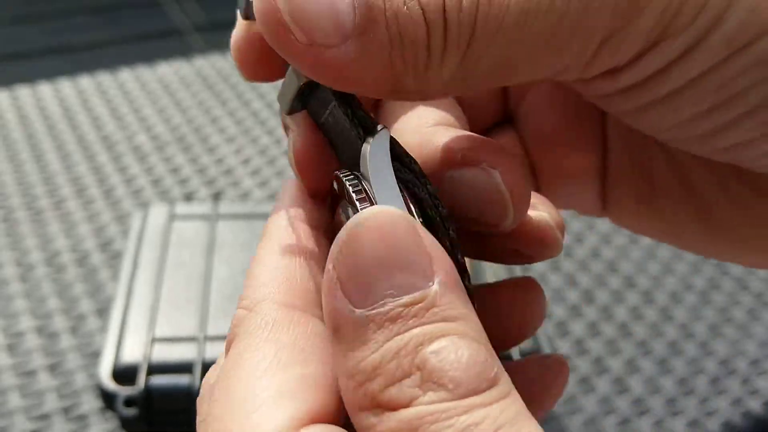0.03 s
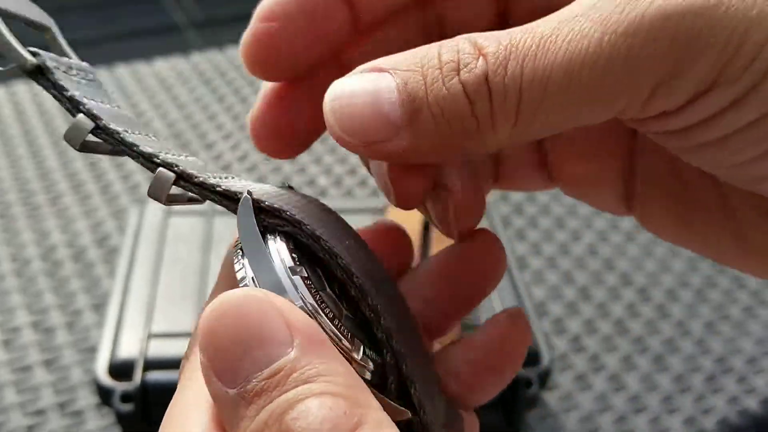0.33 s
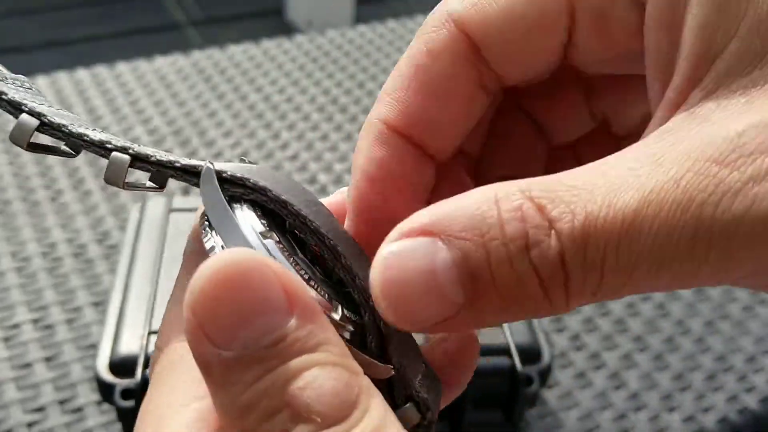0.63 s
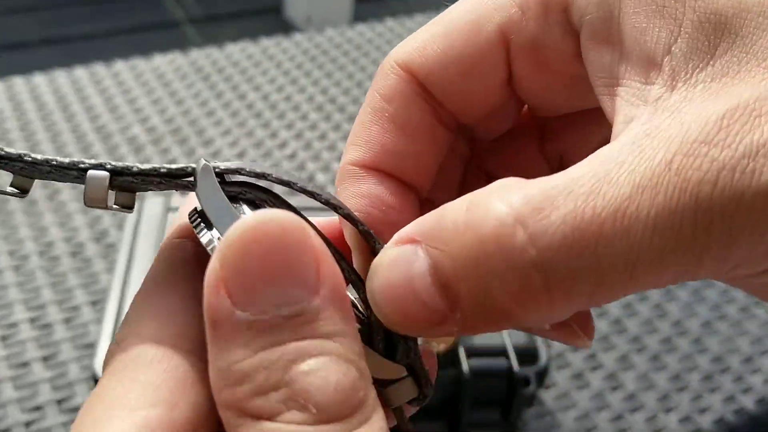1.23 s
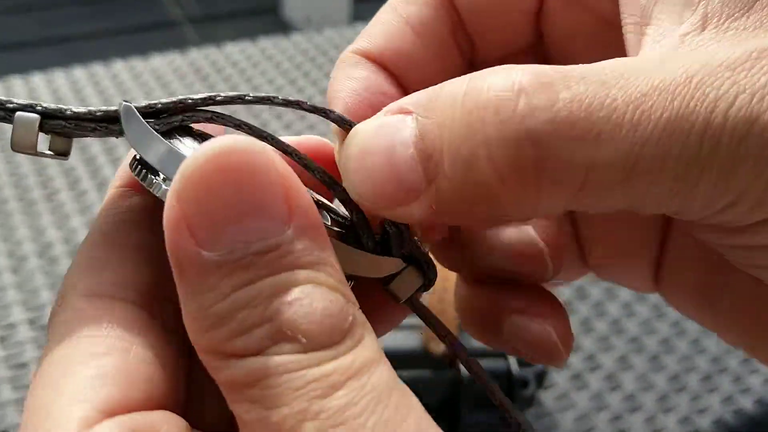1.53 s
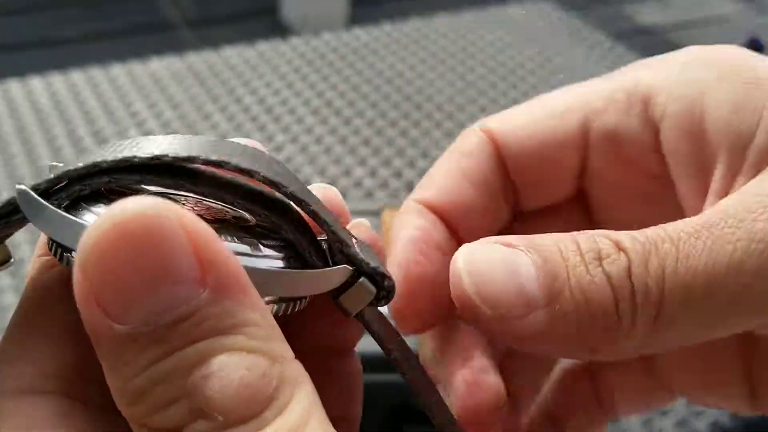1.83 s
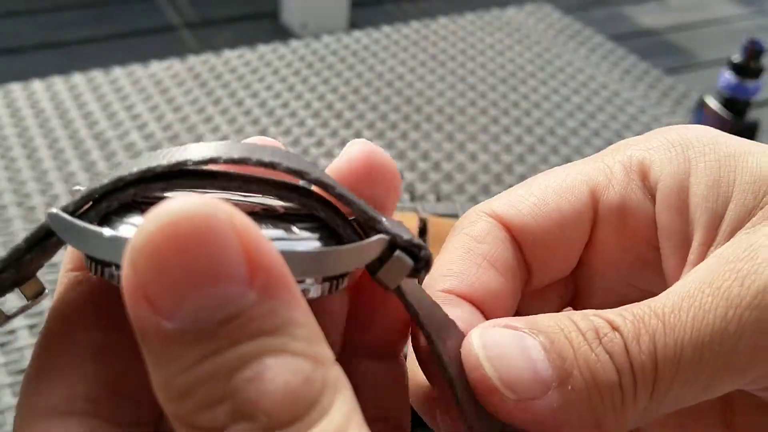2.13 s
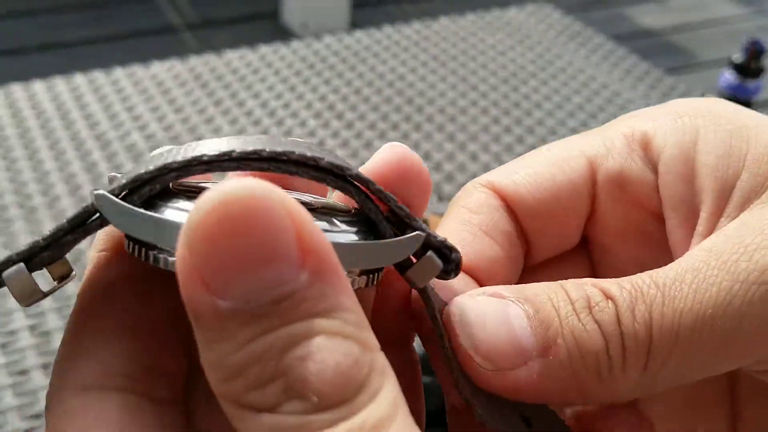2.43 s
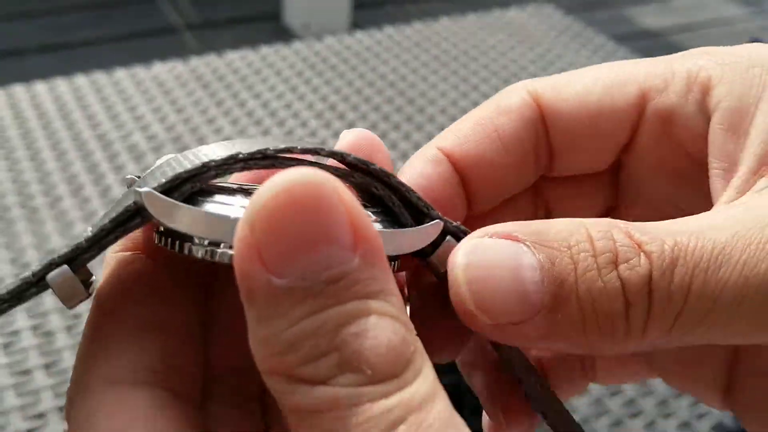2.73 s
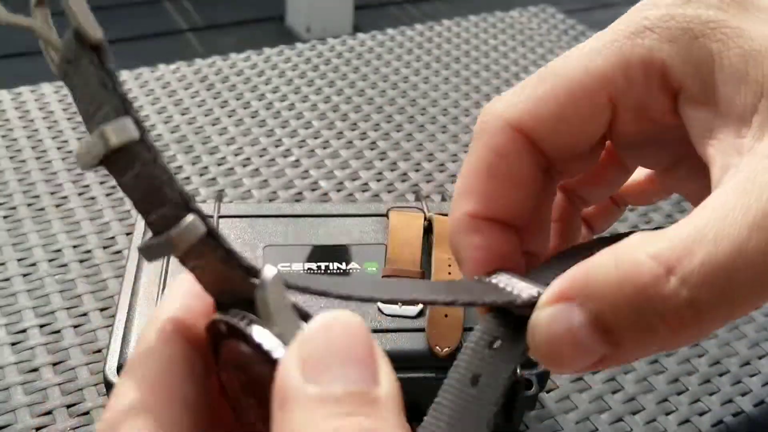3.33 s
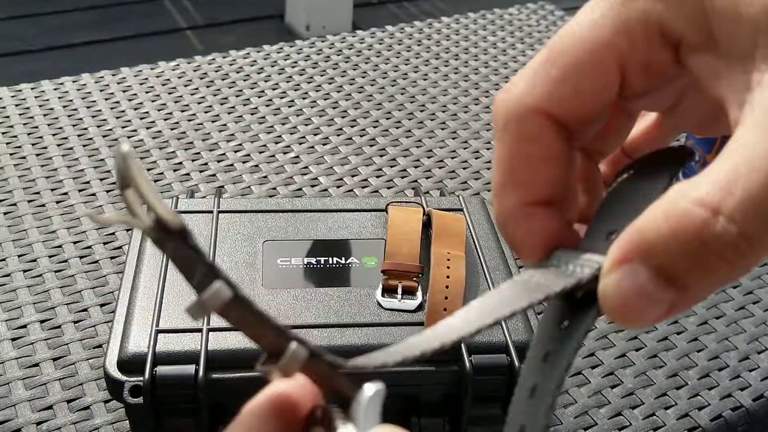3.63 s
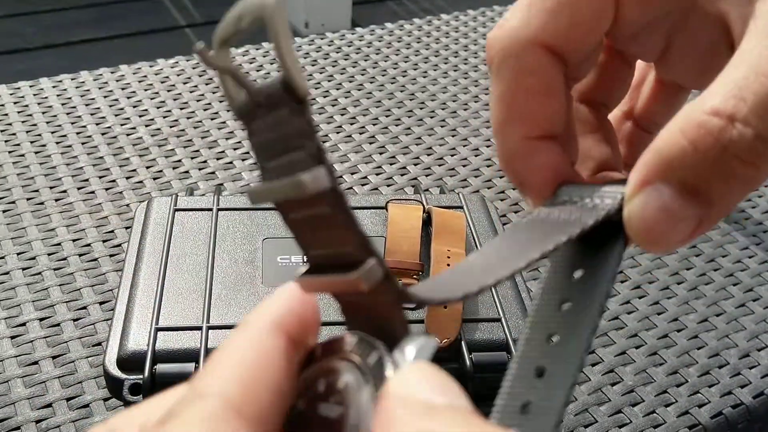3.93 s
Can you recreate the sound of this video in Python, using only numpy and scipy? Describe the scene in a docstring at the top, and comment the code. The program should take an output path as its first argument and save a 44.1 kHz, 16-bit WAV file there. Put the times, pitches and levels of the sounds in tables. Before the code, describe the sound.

A woven watch strap rustles and scrapes through a steel watch, with one sharp click.

```python
"""A woven strap is worked loose and drawn through the bars of a steel watch, close to the microphone.
Throughout: fan-like hum, low rumble, a soft distant wash with faint tones, hiss.
From 0.1 s fingers brush the weave and the fittings tick. At 1.19 s steel snaps on steel, once.
From 3.1 s the long pull swishes, rasps, then breaks into stick-slip jerks and snags as it tightens."""
import sys
import numpy as np
from scipy import signal
from scipy.io import wavfile
from scipy.ndimage import map_coordinates

SR = 44100
rng = np.random.default_rng(int(sys.argv[2]) if len(sys.argv) > 2 else 0)


def generate_wav(sig):
    """Save sig (samples, or channels by samples) to the path in sys.argv[1] as 16-bit PCM at SR."""
    pcm = np.round(np.clip(np.atleast_2d(sig).T, -1, 1) * 32767).astype(np.int16)
    wavfile.write(sys.argv[1], SR, pcm)


N = 176400
T = np.arange(N) / SR

# Table levels are relative. Colours are spectral densities.
# low rumble; deepest rumble, growing with the pull: (time [s], level [dB])
RUMBLE_LEVEL = [(0.0, -45.5), (0.14, -54), (0.17, -43.5), (0.36, -46.5), (0.66, -40.5), (0.89, -51),
                (1.35, -42), (1.65, -55), (1.71, -44.5), (2.22, -48), (2.26, -41.5), (3.13, -48.5),
                (3.19, -44.5), (3.53, -48.5), (3.65, -44.5), (3.83, -41.5), (3.9, -57.5), (4.0, -37.5)]
DEEP_LEVEL = [(0, -61.5), (3.0, -50.5), (3.3, -43), (3.55, -38.5), (3.72, -31.5), (3.83, -44), (3.9, -59)]
# mid-band wash, about two swells a second: (time [s], level [dB])
SWELL_LEVEL = [(0, -58), (.06, -50), (.3, -63.5), (.45, -56.5), (.62, -61.5), (.81, -51.5), (.88, -64),
               (.98, -51.5), (1.4, -62.5), (1.58, -54.5), (1.75, -59.5), (2.03, -57.5), (2.28, -60),
               (2.41, -53), (2.54, -56.5), (2.84, -66), (3.05, -54), (3.35, -59.5), (3.54, -52),
               (3.68, -57.5), (3.9, -51.5), (4.0, -56)]
# background colours: (frequency [Hz], level [dB])
RUMBLE_SPECTRUM = [(22, -21), (33, -15), (45, -3), (58, 3.5), (72, 2), (88, -4), (115, -26), (160, -44)]
DEEP_SPECTRUM = [(25, -17), (35, -7.5), (48, -1.5), (60, -0.5)]
WASH_SPECTRUM = [(100, -6), (140, 2), (165, -7.5), (215, 6), (290, -0.5), (380, -10), (600, -8.5),
                 (820, -12), (1080, -11), (1500, -23.5), (2200, -24)]
SWELL_SPECTRUM = [(430, -8), (540, 2.5), (660, 0), (820, -13.5), (1050, -7.5), (1300, -24)]
HISS_SPECTRUM = [(1500, 5), (2300, 5), (4500, 4), (6000, 0), (7500, -3.5), (10000, -42), (13000, -18),
                 (16000, -1.5)]
# background left-right likeness: (frequency [Hz], correlation [0-1])
CORRELATION = [(60, 1), (140, 1), (260, 0.92), (500, 0.67), (1000, 0.19), (2000, 0), (16000, 0)]
# hum lines: (frequency [Hz], rms level [dB])
HUM_LINES = [(257.8, -44.5), (58.7, -52.5), (137.8, -62), (435, -70)]
# wash resonances: (frequency [Hz], level [dB], t60 [s])
WASH_MODES = [(576, -8.5, 0.045), (640, -4.5, 0.035), (1041, -16.5, 0.097)]
# finger and strap rubs: (peak time [s], level [dB], rise [s], fall [s], left minus right [dB],
# treble lift and bass cut about 7 kHz [dB], resonance [Hz])
RUB_STROKES = [(.10, -54, 0.032, 0.02, 0, -3, 8500), (.17, -55.5, 0.016, 0.019, 0, -3, 9700),
               (0.300, -43, 0.019, 0.013, 3, -2, 7600), (0.38, -62, 0.028, 0.045, 2, 4, 6360),
               (0.72, -43, 0.019, 0.027, 1, -2, 9500), (0.80, -62, 0.025, 0.035, -4, 1, 9800),
               (1.185, -41.5, 0.016, 0.019, -7, 2.5, 9600), (1.30, -60, .02, 0.009, -6, -1, 10300),
               (1.569, -59.5, 0.024, 0.021, -2, -8, 4600), (1.723, -50.5, 0.011, 0.013, -3, -9, 3020),
               (1.742, -38, 0.01, 0.007, 2, -1, 9300), (1.78, -57, 0.015, 0.013, -12, -19, 4200),
               (2.17, -58.5, 0.17, 0.15, 0, 0, 12800), (2.46, -56, 0.023, 0.052, 6, 1, 10400),
               (2.582, -41.5, 0.024, 0.014, 3.5, 0, 12000), (2.65, -57.5, 0.035, 0.032, 4, -3, 10000),
               (3.022, -56, 0.016, 0.012, 3, -3, 9800), (3.098, -59.5, 0.095, 0.14, 0, 1, 10050)]
# touches of the fittings: (time [s], level [dB], left minus right [dB])
TICK_CONTACTS = [(0.3574, -36, -1), (.6130, -39.5, -6), (.638, -34.5, -5), (1.354, -42, 6),
                 (1.8538, -37.5, 7), (2.397, -40, 6), (2.858, -39, 2), (3.238, -40, 9), (3.288, -34, 11)]
# passing tones: (peak time [s], frequency [Hz], level [dB], half-length [s])
TONE_SWELLS = [(.43, 2900, -76, 0.067), (0.484, 1050, -59.5, .05), (1.06, 1016, -60.5, 0.031),
               (1.345, 1050, -61, 0.046), (2.462, 640, -57, 0.057), (3.765, 805, -57, 0.033)]
# steel-on-steel contacts: (time [s], level [dB])
SNAP_CONTACTS = [(1.1914, -22.5), (1.1922, -21), (1.1935, -20)]
# case modes: (frequency [Hz], level [dB], t60 [s])
STEEL_MODES = [(2640, -29, 0.012), (3940, -38, 0.0062), (5560, -28, 0.0089), (6650, -27, 0.009),
               (8600, -34, .007), (9200, -25, 0.01), (9850, 1.5, 0.011), (9940, -14, 0.0068),
               (10800, -26, 0.0091), (12200, -25, .005), (13200, -22, 0.0046), (14850, -28, .005)]
# sliding friction of the pull: (time [s], level [dB])
PULL_LEVEL = [(3.12, -72), (3.22, -58.5), (3.27, -47), (3.33, -44), (3.365, -40), (3.422, -43.5),
              (3.445, -62), (3.487, -63), (3.494, -42.5), (3.53, -38), (3.56, -45), (3.59, -63),
              (3.70, -54), (3.82, -66), (3.86, -65), (4.0, -63)]
# stick-slip jerks: (time [s], level [dB], fall half-length [s])
SLIP_JERKS = [(3.437, -41.5, 0.0019), (3.49, -38, 0.0017), (3.514, -36, 0.0036), (3.529, -31, 0.0017),
              (3.54, -33.5, 0.0045), (3.556, -34, .003), (3.565, -33, 0.0035), (3.579, -36.5, 0.0044),
              (3.596, -33.5, 0.0035), (3.61, -40, 0.0029), (3.628, -41, 0.0022), (3.636, -35, 0.0036),
              (3.648, -35, 0.0032), (3.686, -34, 0.0032), (3.715, -37, 0.0039), (3.74, -37.5, 0.004),
              (3.753, -39, 0.0015), (3.769, -39, 0.0034), (3.792, -43.5, 0.0066), (3.811, -40.5, 0.0025),
              (3.829, -44, 0.0052), (3.891, -46, 0.0027), (3.91, -40, 0.005), (3.955, -41.5, 0.0048)]
# snags on a bar: (time [s], level [dB])
SNAGS = [(3.5252, -32.5), (3.6375, -27.5), (3.6489, -31), (3.688, -29), (3.742, -35.5), (3.755, -33)]
# friction and contact colours: (frequency [Hz], level [dB])
RUB_SPECTRUM = [(1200, -43), (2100, -8), (3100, -3), (3800, -5.5), (4600, 1), (7200, -3.5), (9500, 3),
                (11300, -5), (12700, -5), (14000, -15), (16000, -13)]
SNAP_SPECTRUM = [(1700, -30), (2500, -8.5), (4200, -9), (7000, -6), (9700, 12), (11000, 2), (13200, 4),
                 (14500, -3), (16000, -6)]
SWISH_SPECTRUM = [(1500, 7), (3000, -8), (5500, 3), (7500, -25), (8800, -1), (10000, 2.5), (11300, 3.5),
                  (12700, 0), (14300, -27), (16000, -23)]
RASP_SPECTRUM = [(1000, -11), (2000, -12.5), (3000, 0), (4200, 1), (7500, 1), (10200, 2.5), (11800, 0),
                 (13300, 5.5), (14300, -8), (16000, -11)]
SLIP_SPECTRUM = [(1000, -13.5), (1600, -2), (2100, -9), (3200, 2.5), (4200, 3.5), (6500, -0.5), (9500, -1),
                 (11800, -6.5), (13300, -10), (14300, -10), (16000, -20)]
# microphone port response to near sound: (frequency [Hz], left minus right [dB])
PORT_BALANCE = [(1000, 1), (3400, 2), (4300, 2.5), (5600, -0.5), (6900, 5.5), (8000, 1), (9800, 0),
                (11300, 3.5), (12500, 10.5), (13300, -7), (14500, 6), (16000, 1)]


def from_db(db):
    """Decibels to gain."""
    return 10 ** (np.asarray(db) / 20)


def rms_one(x):
    """Scale to unit rms."""
    return x / np.sqrt(np.mean(x ** 2) + 1e-20)


def in_time(rows):
    """Linear curve through (time [s], value) points."""
    return np.interp(T, *np.transpose(rows))


def at_hz(points, hz):
    """Read (frequency [Hz], value) points on a log axis."""
    freqs, values = np.transpose(points)
    return np.interp(np.log(hz), np.log(freqs), values)


def pan(db):
    """Stereo gains for a left-minus-right level."""
    return from_db(np.array([[db], [-db]]) / 2)


def bell(peak_s, width_s):
    """Gaussian envelope, height 1."""
    return np.exp(-.5 * np.minimum(((T - peak_s) / width_s) ** 2, 100))


def drift(corner_hz, step=40):
    """Low-passed random wander, unit rms."""
    pole = np.exp(-2 * np.pi * corner_hz * step / SR)
    white = rng.standard_normal(N // step + 2002)
    slow = signal.lfilter([1], [1, -2 * pole, pole * pole], white)[2000:]
    return np.interp(np.arange(N) / step, np.arange(len(slow)), rms_one(slow))


def coloured(x, spectrum, size=257):
    """Minimum-phase colour filter; keeps the power of white noise."""
    hz = np.linspace(0, SR / 2, size)
    gain = from_db(at_hz(spectrum, hz + 1)) * np.minimum(hz / spectrum[0][0], 1)
    taps = signal.minimum_phase(signal.firwin2(size, hz, gain ** 2, fs=SR))
    return signal.lfilter(taps / np.linalg.norm(taps), [1], x)


def delayed(x, lag_s):
    """Fractional delay, constant or moving."""
    return map_coordinates(x, [np.arange(N) - lag_s * SR], order=3)


def ring(x, hz, t60_s):
    """One mode: a unit click starts a decaying unit sine."""
    pole, angle = from_db(-60 / (t60_s * SR)), 2 * np.pi * hz / SR
    return signal.lfilter([0, np.sin(angle)], [1, -2 * pole * np.cos(angle), pole * pole], x + 1e-18)


def noisy_tone(hz, t60_s):
    """Noise-driven mode, unit rms."""
    return rms_one(ring(rng.standard_normal(N), hz, t60_s))


def banded_noise(spectrum, low_hz, bands, swell_db=0):
    """Third-octave stereo noise; level, swell and correlation per band."""
    out, white = 0, rng.standard_normal((2, 2, N + SR // 2))
    edges_hz = low_hz * 2 ** (np.arange(bands + 1) / 3)
    for k, (low, high) in enumerate(zip(edges_hz, edges_hz[1:])):
        bandpass = signal.butter(2, [low, high], "band", fs=SR, output="sos")
        mid, side = signal.sosfilt(bandpass, white[k % 2])[:, -N:]
        hz = np.sqrt(low * high)
        alike = at_hz(CORRELATION, hz)
        stereo = np.sqrt(1 + alike) * mid + np.sqrt(1 - alike) * side * [[1], [-1]]
        out = out + from_db(at_hz(spectrum, hz) + swell_db * drift(4.2)) * stereo
    return rms_one(out)


def hum(waver_db=1.0, waver_hz=0.91):
    """Fan-like lines, wavering slightly in level and pitch."""
    out = 0
    for hz, db in HUM_LINES:
        peak = np.sqrt(2) * from_db(db + waver_db * drift(10.4))
        cycles = np.cumsum(hz + waver_hz * drift(2.74)) / SR + rng.random()
        out = out + peak * np.sin(2 * np.pi * cycles)
    return out


def rumble():
    """Uneven low noise; the deepest layer peaks during the pull."""
    low = from_db(in_time(RUMBLE_LEVEL) + 2) * banded_noise(RUMBLE_SPECTRUM, low_hz=20.12, bands=9)
    deep = from_db(in_time(DEEP_LEVEL)) * banded_noise(DEEP_SPECTRUM, low_hz=22.2, bands=5)
    return low + deep


def wash(swell_db=1.73):
    """Distant noise: a broad bed that lifts late, a swelling mid band with faint pitches."""
    bed_db = -51.5 + 5.5 * in_time([(3.3, 0.35), (3.7, 1), (4.0, 0.82)])
    bed = banded_noise(WASH_SPECTRUM, low_hz=91.8, bands=13, swell_db=swell_db)
    mids = from_db(-2) * banded_noise(SWELL_SPECTRUM, low_hz=378.6, bands=6, swell_db=swell_db)
    pitches = sum(from_db(db) * noisy_tone(hz, t60_s) for hz, db, t60_s in WASH_MODES)
    return from_db(bed_db) * bed + from_db(in_time(SWELL_LEVEL)) * (mids + pitches)


def hiss():
    """Steady treble noise."""
    return from_db(-64.5) * banded_noise(HISS_SPECTRUM, low_hz=1645, bands=10)


def fibres(rough_db, clicks_per_s=5500, spread_db=3.5, hiss_gain=0.33, shared_gain=0.34):
    """Threads catch and release: dense uneven clicks on hiss, partly common to both sides."""
    sizes = from_db(spread_db * np.minimum(rng.exponential(1, (3, N)), 5))
    signs = rng.choice([-1, 1], (3, N))
    clicks = rms_one(sizes * signs * (rng.random((3, N)) < clicks_per_s / SR))
    grain = clicks + hiss_gain * rng.standard_normal((3, N))
    return rms_one((grain[:2] + shared_gain * grain[2]) * from_db(rough_db * drift(130)))


def rubs(gain_db=-4.5, ring_db=-5.5):
    """Fingers brush the weave; each stroke has its own tilt and resonance."""
    threads = fibres(rough_db=2.0)
    grain = coloured(threads, RUB_SPECTRUM)
    low = signal.sosfiltfilt(signal.butter(2, 7000, fs=SR, output="sos"), grain)
    out = 0
    for peak_s, db, rise_s, fall_s, pan_db, tilt_db, hz in RUB_STROKES:
        swell = np.exp(-np.abs((T - peak_s) / np.where(T < peak_s, rise_s, fall_s)) ** 1.17)
        scrape = rms_one(low * from_db(-tilt_db) + (grain - low) * from_db(tilt_db))
        resonance = from_db(ring_db) * rms_one(ring(threads[:, ::-1], hz, t60_s=0.0022))
        out = out + from_db(db + gain_db) * pan(pan_db) * swell * rms_one(scrape + resonance)
    return out


def hand_reflection(x, gain=0.35, lag_s=0.0009):
    """One short echo a side; its path wanders as the hands move."""
    echo = np.array([delayed(side, lag_s * np.exp(0.15 * drift(1.19))) for side in x])
    return (x + gain * echo) / np.hypot(1, gain)


def ports(x, right_lag_s=0.000193):
    """Each microphone port colours near sound differently; the left hears it first."""
    balance = [(20, 0)] + list(PORT_BALANCE)
    left = coloured(x[0], [(hz, db / 2) for hz, db in balance])
    right = coloured(x[1], [(hz, -db / 2) for hz, db in balance])
    return np.array([left, delayed(right, right_lag_s)])


def room(x, t60_s=0.14, gap_s=0.004):
    """Diffuse tail from nearby surfaces."""
    t = T[:SR // 2]
    tail = rng.standard_normal((2, len(t))) * from_db(-60 * t / t60_s) * (t > gap_s)
    tail /= np.linalg.norm(tail, axis=1, keepdims=True)
    return signal.fftconvolve(x, tail, axes=1)[:, :N]


def contact(start_s, decay_s):
    """Gritty contact: a decaying noise burst."""
    envelope = (T >= start_s) * np.exp(-np.clip((T - start_s) / decay_s, 0, 50))
    return envelope * rng.standard_normal((2, N))


def ticks(gain_db=-11.5):
    """Light touches of the fittings."""
    bursts = sum(from_db(db + gain_db) * pan(pan_db) * contact(time_s, decay_s=0.0021)
                 for time_s, db, pan_db in TICK_CONTACTS)
    return coloured(bursts, RUB_SPECTRUM)


def faint_tones():
    """Narrow wavering tones swell and fade."""
    return sum(from_db(db) * bell(peak_s, width_s) * noisy_tone(hz, t60_s=0.066)
               for peak_s, hz, db, width_s in TONE_SWELLS)


def snap(ring_db=-13, crack_db=-3.5, scatter_db=3.1):
    """Steel knocks on steel as the strap frees; each contact cracks and rings the case."""
    times_s, levels_db = np.transpose(SNAP_CONTACTS)
    rings = np.zeros((2, N))
    for hz, mode_db, t60_s in STEEL_MODES:
        strikes_db = levels_db + mode_db + ring_db + rng.normal(0, scatter_db, (2, len(times_s)))
        clicks = np.zeros((2, N))
        clicks[:, (times_s * SR).astype(int)] = from_db(strikes_db)
        rings += ring(clicks, hz, t60_s)
    crack = sum(from_db(db + crack_db) * contact(time_s, decay_s=0.0012) for time_s, db in SNAP_CONTACTS)
    return pan(-7.5) * rings + coloured(crack, SNAP_SPECTRUM)


def pull():
    """The weave slides over the bars: swish, then rasp, darkening as it tightens."""
    sliding = from_db(in_time(PULL_LEVEL)) * fibres(rough_db=1.5)
    # colour crossfade: 0 swish, 1 rasp, 2 slip; steps up at 3.33 s
    stage = np.interp(T, [3.33, 4.0], [1.337, 2.042], left=0.55)
    return sum(coloured(sliding * np.maximum(1 - np.abs(stage - k), 0), spectrum)
               for k, spectrum in enumerate((SWISH_SPECTRUM, RASP_SPECTRUM, SLIP_SPECTRUM)))


def stick_slip(pan_db, gain_db=-4, rise_ratio=0.71, tug_db=-10.5):
    """The taut strap jerks: fast-rising scrapes, each with a dull centred tug."""
    jerks = sum(from_db(db + gain_db) * bell(time_s, fall_s * np.where(T < time_s, rise_ratio, 1))
                for time_s, db, fall_s in SLIP_JERKS)
    tug = from_db(tug_db) * jerks * noisy_tone(hz=500, t60_s=0.029)
    scrape = coloured(jerks * fibres(rough_db=1.5), SLIP_SPECTRUM)
    return pan(pan_db) * scrape + tug


def snags():
    """The weave catches on a bar and cracks free."""
    cracks = sum(from_db(db) * contact(time_s, decay_s=0.00087) for time_s, db in SNAGS)
    return coloured(cracks, SLIP_SPECTRUM)


def scene(pull_pan_db=1.4):
    """Strap and watch close up, over the background; the snap stays dry."""
    weave = rubs() + pan(pull_pan_db) * pull() + stick_slip(pull_pan_db)
    near = ports(hand_reflection(weave) + ticks() + snags())
    reverb = from_db(-13) * pan(-11) * room(near)
    return near + reverb + snap() + hum() + rumble() + wash() + hiss() + faint_tones()


def record(dry, cutoff_hz=16000):
    """Steep low-pass."""
    return signal.sosfilt(signal.ellip(10, .1, 80, cutoff_hz, fs=SR, output="sos"), dry)


dry = scene()
out = record(dry)
generate_wav(out)
```